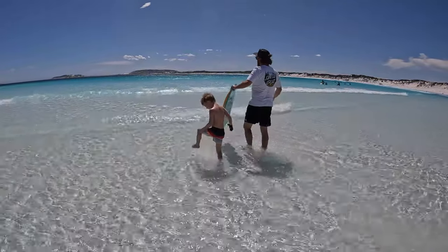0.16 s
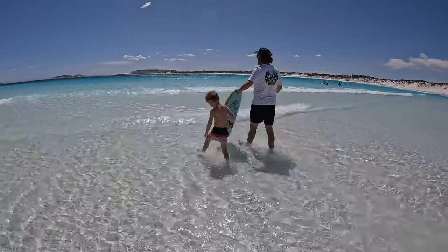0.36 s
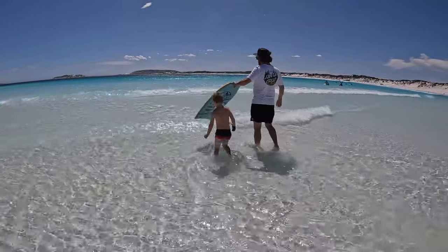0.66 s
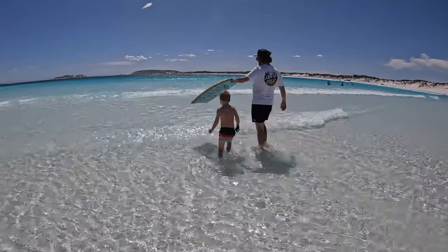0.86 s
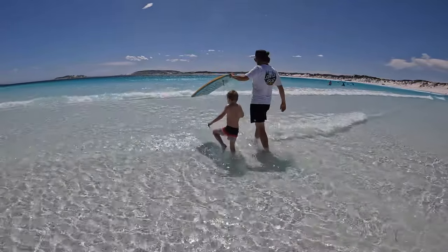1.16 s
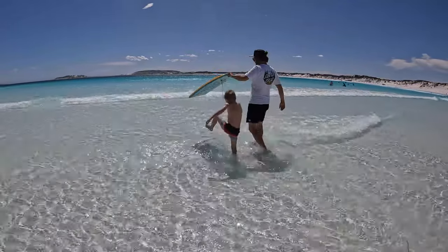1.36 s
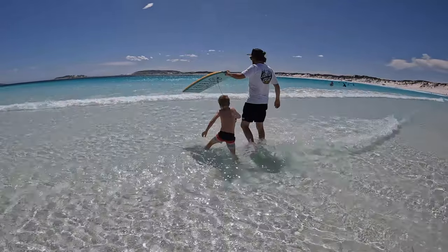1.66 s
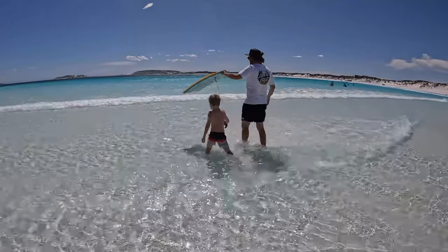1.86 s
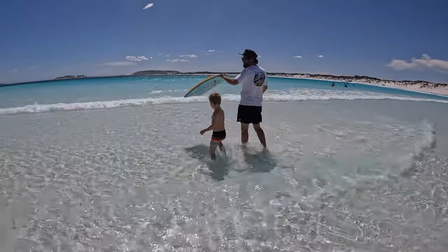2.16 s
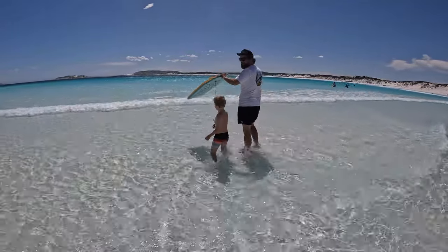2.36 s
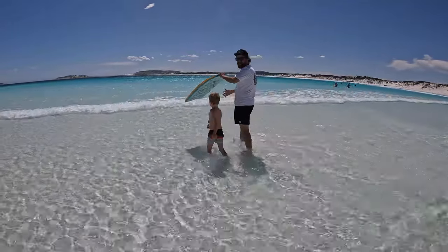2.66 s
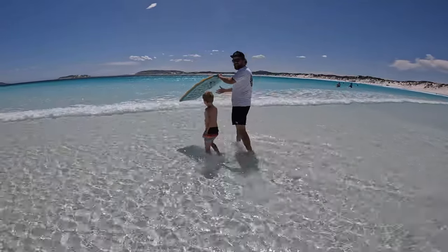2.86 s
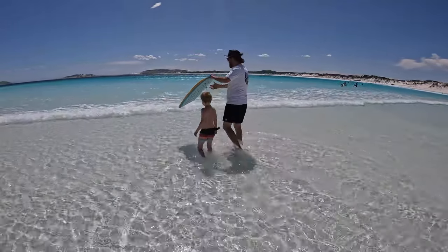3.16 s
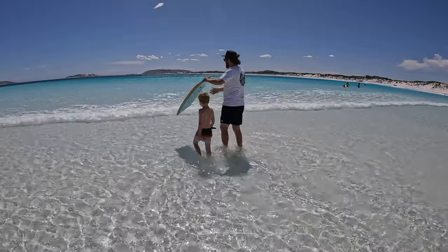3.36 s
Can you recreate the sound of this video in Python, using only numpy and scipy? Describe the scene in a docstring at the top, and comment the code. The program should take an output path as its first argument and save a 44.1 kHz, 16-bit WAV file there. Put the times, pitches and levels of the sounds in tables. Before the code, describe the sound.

Shallow seawater sloshes around wading legs close by, with low gurgles, fizzing spray and showers of drops. Soft wind puffs hit the microphone during the first two seconds. From about 1.3 seconds the spray thins and the wading slows, with gulps and drips around 2 seconds. A last gulp and a soft thump come near 2.7 seconds, leaving the steady distant surf and faint hissing foam.

```python
"""Shallow seawater, open air: wading legs near the microphone, surf washing steadily further out.
From the start the legs churn air under, thrown spray fizzes back and a wavelet's foam hisses past.
A moment later a breeze puffs on the microphone, showers of drops land, the water gulps and drips plink.
From about 1.3 s the wading slows and the spray thins; a last gulp and a soft low thump on the microphone
leave surf and faint foam. Throughout, the microphone's housing hollows the sound with a treble notch."""
import sys
import numpy as np
from scipy import signal
from scipy.fft import rfft, irfft, next_fast_len
from scipy.io import wavfile
from scipy.ndimage import uniform_filter1d, map_coordinates

SR = 44100
rng = np.random.default_rng(int(sys.argv[2]) if len(sys.argv) > 2 else 0)


def to_wav(sig):
    """Store sig (one row per channel, or 1-D mono) as 16-bit WAV at the path in sys.argv[1].

    Samples outside -1..1 are clipped; the rate is SR.
    """
    pcm = np.clip(np.atleast_2d(sig), -1, 1) * 32767
    pcm = np.round(pcm).astype(np.int16)
    wavfile.write(sys.argv[1], SR, pcm.T)  # frames by channels


N = 154350  # 3.5 s
BUBBLE_RISE = 0.072  # share by which a bubble's pitch climbs while it decays 60 dB


def amp(db):
    return 10 ** (np.asarray(db) / 20)


def unit_rms(x):
    return x / np.sqrt(np.mean(x ** 2) + 1e-20)


def curve(rows):
    """(t/s, value) points joined to one value per sample."""
    return np.interp(np.arange(N) / SR, *np.transpose(rows))


def swells(rows):
    """A sum of bell-shaped envelopes from (t/s, half width/s, level/dB) rows."""
    t = np.arange(N) / SR
    return sum(amp(db) * np.exp(-((t - s) / width) ** 2 / 2) for s, width, db in rows)


def wobble(rate_hz):
    """A smooth random curve with rate_hz knots a second."""
    return map_coordinates(rng.standard_normal(1024), [np.arange(N) * rate_hz / SR], mode="wrap")


def filtered(x, response):
    """x with its spectrum multiplied by response(hz)."""
    m = next_fast_len(N + SR // 2)
    return irfft(rfft(x, m) * response(np.fft.rfftfreq(m, 1 / SR)), m)[:N]


def coloured(x, points):
    """x through a causal filter given as (f/Hz, level/dB) points, at rms 1."""
    m = 2 * next_fast_len(N // 2 + SR // 4)
    hz, db = np.transpose(points)
    gain = amp(np.interp(np.log(np.fft.rfftfreq(m, 1 / SR) + 1), np.log(hz + 1), db))
    cepstrum = irfft(np.log(np.maximum(gain, 1e-6)), m)
    cepstrum[1:m // 2] *= 2  # folded for minimum phase
    cepstrum[m // 2 + 1:] = 0
    return unit_rms(irfft(rfft(x, m) * np.exp(rfft(cepstrum)), m)[:N])


def patchy_noise(depth_db):
    """White noise with patches of random gain in time and frequency."""
    spectra = signal.stft(rng.standard_normal(N), nperseg=512)[2]
    patches = uniform_filter1d(rng.standard_normal(spectra.shape), size=5, axis=0)
    patches = unit_rms(uniform_filter1d(patches, size=7, axis=1))
    return unit_rms(signal.istft(spectra * amp(depth_db * patches), nperseg=512)[1][:N])


def bubbles(lo_hz, hi_hz, cycles, spread_db, count, samples):
    """A cloud of rising rings, each 60 dB down after about `cycles` periods: small ones die fastest."""
    when, pitch, strength, life = rng.random((count, 4)).T[:, :, None]
    hz = lo_hz * (hi_hz / lo_hz) ** pitch
    t = np.arange(samples) / SR
    age = t * hz / (cycles * (.5 + life))
    peak = amp(-spread_db * np.log(strength + .02)) * hz  # many weak, a few strong
    envelope = peak * np.exp(-np.log(1000) * age) * (1 - np.exp(-2 * hz * t))
    rings = envelope * np.sin(2 * np.pi * hz * t * (1 + BUBBLE_RISE * np.minimum(age, 2) / 2))
    at = (when * N).astype(int) + np.arange(samples)
    return unit_rms(np.bincount(at.ravel(), rings.ravel(), N)[:N])


def plops(rows, attack_s, splash_db, splash_s):
    """Single plops: each swells, rings and rises a little, with a burst of noise round its pitch."""
    out, t = np.zeros(N + SR), np.arange(SR // 8) / SR
    swell = 1 - np.exp(-(t / attack_s) ** 3)
    for s, hz, db, t60 in rows:
        shape = swell * np.exp(-np.log(1000) * t / t60)
        ring = shape / shape.max() * np.sin(2 * np.pi * hz * t * (1 + BUBBLE_RISE * t / t60 / 2))
        edges_hz = np.minimum([hz / 1.32, hz * 1.32], SR / 2 - 1)
        band = signal.butter(4, edges_hz, "band", fs=SR, output="sos")
        splash = unit_rms(signal.sosfilt(band, rng.standard_normal(len(t)))) * np.exp(-t / splash_s * 2)
        out[round(s * SR):][:len(t)] += amp(db) * (ring + amp(splash_db) * splash)
    return out[:N]


# Water churning round the legs (t/s, level/dB)
CHURN_LEVEL = [(0, -23.5), (.09, -24.5), (.19, -16.5), (.33, -23), (.43, -20.5), (.54, -22.5), (.78, -20.5),
               (.92, -23), (1.075, -22.5), (1.13, -19.5), (1.27, -24), (1.36, -22), (1.395, -33),
               (1.44, -24.5), (1.52, -24), (1.61, -24.5), (1.66, -34), (1.70, -20), (1.79, -33.5),
               (1.85, -25.5), (2.19, -31), (2.26, -28.5), (2.45, -30), (3.15, -45)]
# Its spectrum at the microphone (f/Hz, relative level/dB)
CHURN_SPECTRUM = [(60, -51.5), (130, -14.5), (290, -17.5), (370, -2), (470, 1), (570, 4), (720, 0),
                  (840, 2), (950, -10), (1400, -30), (2500, -38.5), (6000, -64)]
def churn():
    """Near the microphone, legs drag air under: a dense run of low gulps on a wash."""
    pockets = bubbles(232, 1607, cycles=10, spread_db=2.2, count=2400, samples=1600)
    wash = amp(-2) * np.sqrt(SR / 2 / 1250) * patchy_noise(depth_db=2.9)  # level set per 1250 Hz of band
    water = coloured(pockets + wash, CHURN_SPECTRUM)
    return amp(curve(CHURN_LEVEL)) * unit_rms(water * amp(0.1 * wobble(52)))


# Spray falling round the wader (t/s, level/dB)
SPRAY_LEVEL = [(0, -47), (.13, -35.5), (.22, -36), (.33, -34), (.46, -31), (.58, -34), (.66, -37.5),
               (.76, -34), (.86, -38.5), (.92, -33.5), (1.05, -32), (1.11, -36.5), (1.19, -32.5),
               (1.44, -43.5), (2.0, -43), (3.1, -57)]
# Its spectrum at the microphone (f/Hz, relative level/dB)
SPRAY_SPECTRUM = [(500, -12), (1000, -5.5), (1450, -16.5), (2050, 0), (2900, -1.5), (3800, 2.5), (4900, -7),
                  (5800, -9), (7300, -21.5), (10200, -35.5), (12000, -53), (14500, -74.5)]
def spray():
    """Thrown water patters back nearby: short crackles, freed bubbles that ring on, a little hiss."""
    fizz = bubbles(1010, 13600, cycles=28, spread_db=0.4, count=9000, samples=500)
    tinkle = bubbles(1404, 12750, cycles=140, spread_db=2.8, count=1700, samples=2600)
    hiss = patchy_noise(depth_db=-4.5)
    water = coloured(fizz + amp(1) * tinkle + amp(-4) * hiss, SPRAY_SPECTRUM)
    return amp(curve(SPRAY_LEVEL) + 0.34 * wobble(41.3)) * with_surface_echo(water)


def with_surface_echo(direct, delay_s=0.001068, drift=0.286, echo_gain=.42):
    """Spray also reaches the microphone off the water; the path changes as drops fly, so it swirls."""
    lag = delay_s * SR * np.exp(drift * wobble(8))
    echo = map_coordinates(direct, [np.arange(N) - lag])
    return unit_rms(direct + echo_gain * echo)


# Foam of a passing wavelet (t/s, level/dB)
FOAM_LEVEL = [(0, -34.5), (1.7, -37), (2.55, -39.5), (3.1, -48), (3.5, -46)]
# Its spectrum at the microphone (f/Hz, relative level/dB)
FOAM_SPECTRUM = [(600, -31.5), (1000, 5.5), (1450, -1), (3800, 1.5), (7300, -15.5), (8300, -30),
                 (10200, -30.5), (15000, -61.5)]
def foam():
    """A spent wavelet hisses past through the shallows and dies down."""
    level_db = curve(FOAM_LEVEL) + 0.17 * wobble(30)
    return amp(level_db) * coloured(patchy_noise(depth_db=1.86), FOAM_SPECTRUM)


# Distant surf as heard from the shallows (f/Hz, relative level/dB)
SURF_SPECTRUM = [(30, -69), (150, -31.5), (290, -23), (360, -10.5), (580, -1.5), (850, -5.5), (1400, -23.5),
                 (2200, -19), (3800, -20), (7300, -37.5), (10200, -54), (15000, -85)]
def surf(level_db=-36, waver_db=.35):
    """Small waves break further out and reach the microphone as an even wash."""
    return amp(level_db + waver_db * wobble(3.9)) * coloured(patchy_noise(depth_db=0.19), SURF_SPECTRUM)


# Puffs of air on the microphone (t/s, half width/s, level/dB)
BREEZE_PUFFS = [(0.109, 0.011, -25), (0.199, 0.023, -31), (.24, 0.004, -28.5), (0.501, 0.022, -27.5),
                (0.639, 0.0079, -24), (1.111, 0.0038, -28), (1.194, 0.051, -25), (1.46, 0.075, -38),
                (1.61, 0.019, -35.5), (1.694, 0.013, -32), (1.86, 0.057, -43.5)]
# Their low thud (f/Hz, relative level/dB)
BREEZE_SPECTRUM = [(20, -59.5), (70, -18), (115, -10), (160, -3), (260, -3.5), (400, -5), (1500, -68)]
def breeze():
    """Brief puffs thud softly, right on the microphone."""
    return swells(BREEZE_PUFFS) * coloured(rng.standard_normal(N), BREEZE_SPECTRUM)


# Handfuls of drops landing nearby (t/s, half width/s, f/Hz, level/dB)
DROP_SHOWERS = [(.14, 0.018, 3670, -33.5), (.29, .028, 5100, -39), (0.431, 0.035, 3180, -34.5),
                (.5, 0.023, 4940, -41.5), (.505, .02, 10000, -62.5), (.615, .012, 10000, -59),
                (.74, 0.025, 2250, -33.5), (.93, 0.013, 10000, -63), (1.02, 0.046, 2400, -36),
                (1.055, .012, 3800, -33.5), (1.24, .014, 5300, -40.5)]
def showers(pitch_spread_hz=580):
    """Each kick flings a handful of like-sized drops that land together and ring round one pitch."""
    drops = bubbles(1423, 12550, cycles=48, spread_db=1.7, count=6000, samples=1500)

    def drops_near(centre_hz):
        return unit_rms(filtered(drops, lambda hz: np.exp(-((hz - centre_hz) / pitch_spread_hz) ** 2 / 2)))
    return sum(swells([(s, width, db)]) * drops_near(hz) for s, width, hz, db in DROP_SHOWERS)


# Gulps by the legs; last row, a thump on the microphone (t/s, f/Hz, peak level/dB, 60 dB decay/s)
GULPS_AND_THUMP = [(.155, 852, -10.5, 0.074), (.229, 610, -17, 0.021), (.267, 568, -12, 0.026),
                   (.290, 776, -18, 0.11), (.361, 860, -12.5, 0.021), (.406, 617, -12.5, 0.17),
                   (.432, 603, -14, 0.055), (.699, 485, -12, 0.015), (.750, 486, -12.5, 0.019),
                   (.989, 642, -11.5, 0.054), (1.058, 755, -10.5, 0.016), (1.087, 627, -10.5, 0.03),
                   (1.156, 337, -16, 0.059), (1.192, 365, -8, 0.014), (1.235, 366, -17, 0.18),
                   (1.356, 797, -15.5, 0.046), (1.404, 620, -19.5, 0.017), (1.495, 700, -11, 0.01),
                   (1.684, 352, -19, 0.12), (1.842, 787, -16.5, 0.016), (2.000, 540, -16, 0.057),
                   (2.052, 561, -15, 0.14), (2.090, 557, -12, 0.1), (2.117, 643, -15, 0.1),
                   (2.131, 543, -15.5, 0.073), (2.201, 546, -21, 0.037), (2.455, 575, -20, 0.025),
                   (2.708, 519, -8.5, 0.038), (2.780, 140, -36.5, 0.041)]
def gulps_and_thump():
    """Water gulps as it closes over air behind a leg; last comes a soft low thump on the microphone."""
    return plops(GULPS_AND_THUMP, attack_s=0.0033, splash_db=-12, splash_s=0.024)


# Single falling drops (t/s, f/Hz, peak level/dB, 60 dB decay/s)
SINGLE_DROPS = [(.156, 1575, -19, 0.028), (.362, 1140, -26.5, 0.045), (.746, 12600, -56, 0.027),
                (1.592, 1990, -28, 0.026), (1.616, 1150, -25, 0.053), (1.617, 10870, -50, 0.017),
                (1.882, 8830, -47, .025), (2.082, 4030, -27, 0.025), (2.247, 2306, -23.5, 0.03),
                (2.276, 1256, -29, 0.055)]
def drips():
    """A drop lands nearby with a tiny splash, and its small bubble plinks."""
    return plops(SINGLE_DROPS, attack_s=0.0028, splash_db=-9, splash_s=0.01)


def scene():
    """Everything at one microphone over the shallows, in the open air."""
    return (gulps_and_thump() + drips() + churn() + spray() + showers() + breeze() + foam() + surf())[None]


def record(dry):
    """The microphone's housing cancels a narrow band, and the highest treble is cut off."""
    notch_hz, notch_half_width_hz, top_hz = 8940, 440, 14000
    notch = lambda hz: np.abs(hz - notch_hz) / np.hypot(hz - notch_hz, notch_half_width_hz)
    return filtered(dry[0], lambda hz: notch(hz) * (hz < top_hz))[None]


dry = scene()
out = record(dry)
to_wav(out)
```